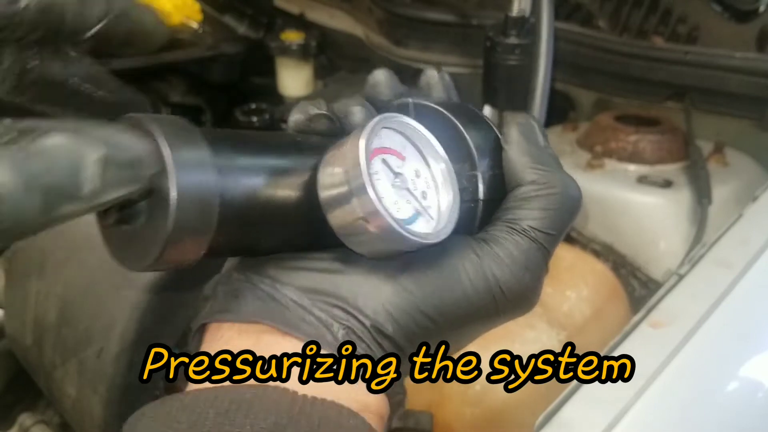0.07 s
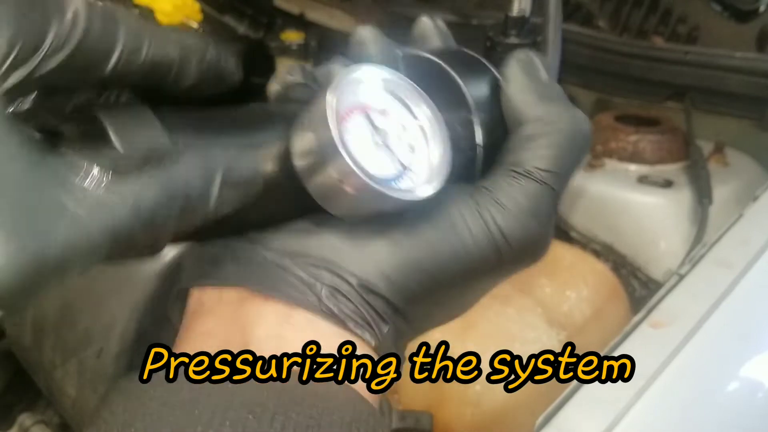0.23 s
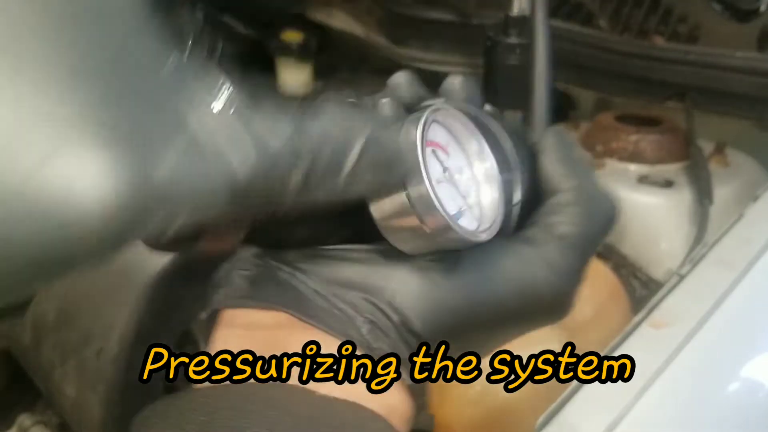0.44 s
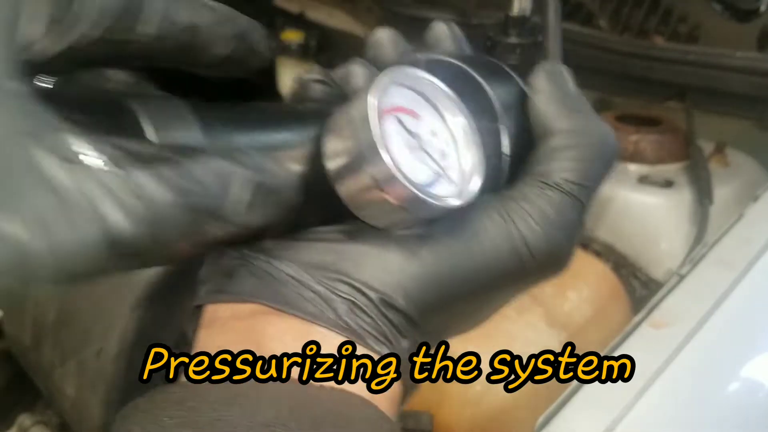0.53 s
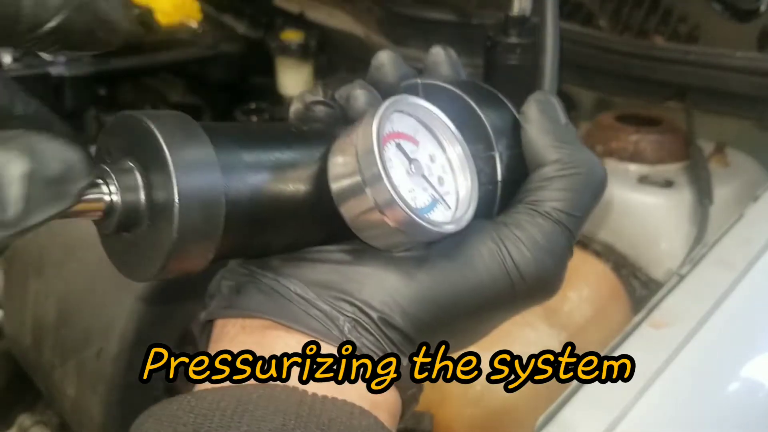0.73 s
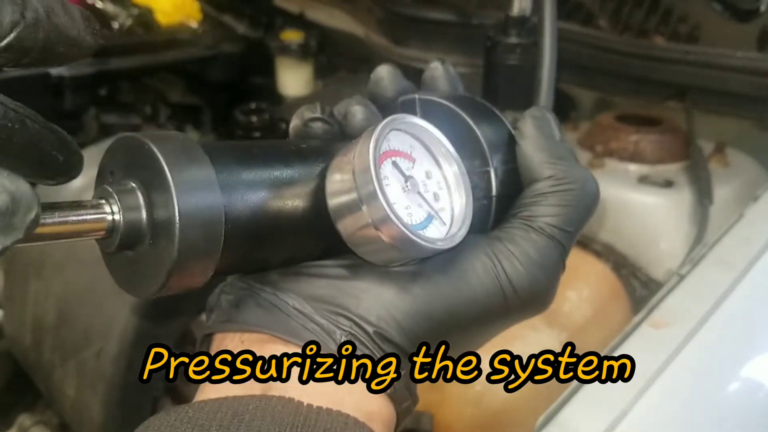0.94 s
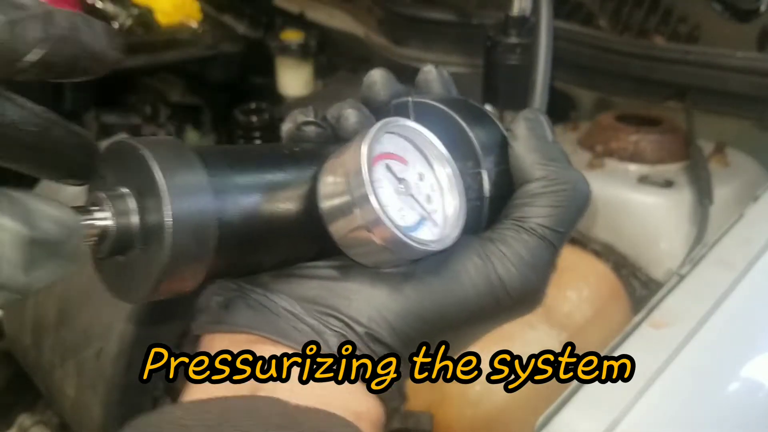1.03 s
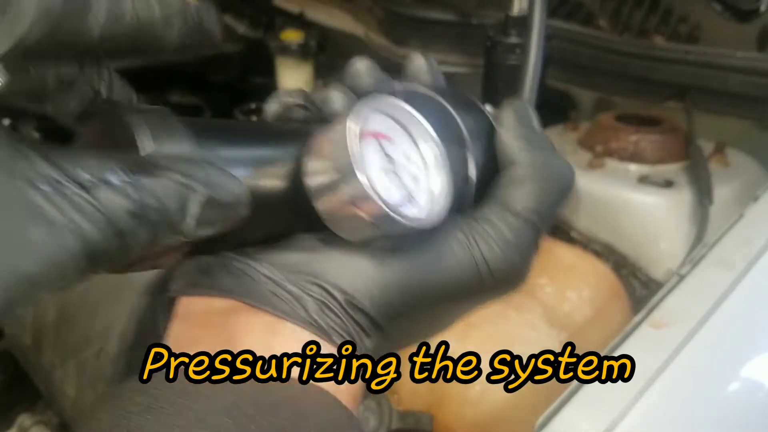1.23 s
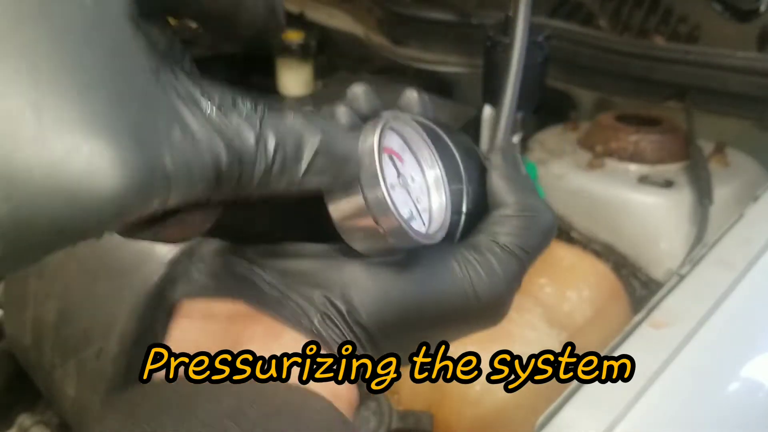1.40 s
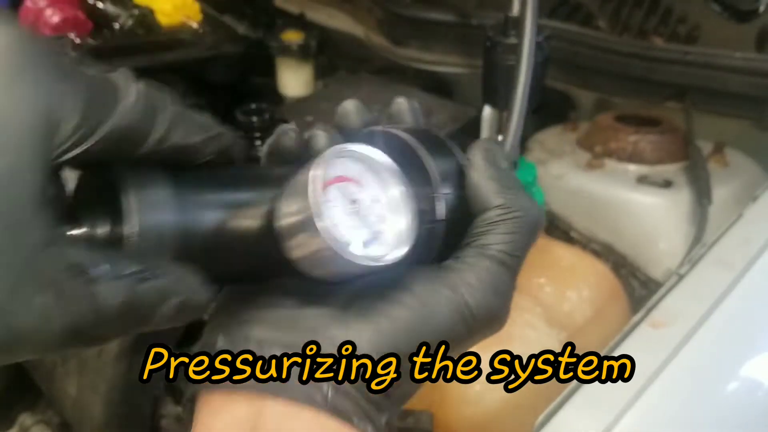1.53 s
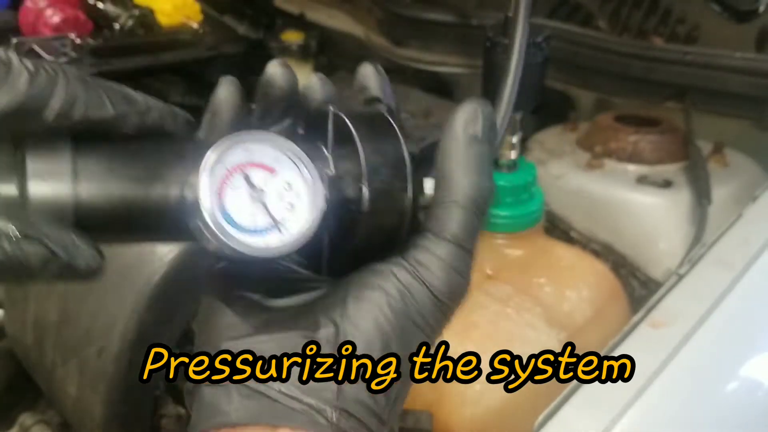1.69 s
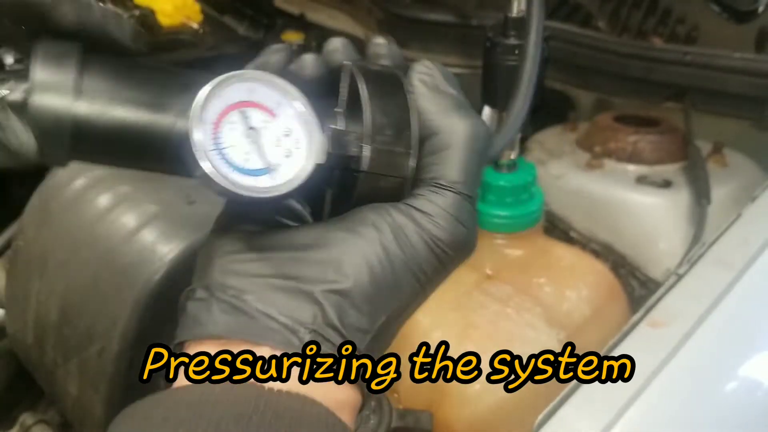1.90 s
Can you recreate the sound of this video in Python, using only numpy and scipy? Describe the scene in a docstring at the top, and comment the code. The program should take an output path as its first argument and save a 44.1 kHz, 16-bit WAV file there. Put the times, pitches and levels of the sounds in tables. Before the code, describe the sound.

Close up over a car engine bay, a hand pump is pushed twice, its airy hiss rising to a hard knock each time. Softer rubbing fills the pull back, with small handling ticks and one handle clack near the end.

```python
"""Hand pump over an engine bay

Two close strokes of a pressure pump. The piston seal hisses along the barrel; late in each push air
rushes and whistles through the valve, then the piston knocks on the end stop and the last air spits out.
The handle clacks once, rod and gloves tick, hands bump, and a low machine rumble lies beneath."""
import sys
import numpy as np
from scipy import signal
from scipy.fft import rfft, irfft, next_fast_len
from scipy.io import wavfile
from scipy.ndimage import map_coordinates

SR = 44100
rng = np.random.default_rng(int(sys.argv[2]) if len(sys.argv) > 2 else 0)


def master_out(mix):
    """Clip the mix to full scale and print it as 16-bit PCM to the path in sys.argv[1]."""
    frames = np.transpose(np.atleast_2d(mix))
    ceiling = np.clip(frames, -1, 1)
    pcm = np.round(ceiling * 32767).astype(np.int16)
    wavfile.write(sys.argv[1], SR, pcm)


N = 85995


def amp(db):
    """Decibels to gain."""
    return 10 ** (np.asarray(db) / 20)


def unit(x):
    """Scale to rms 1."""
    return x / np.sqrt(np.mean(x ** 2) + 1e-20)


def clock():
    """The time of each sample in seconds."""
    return np.arange(N) / SR


def along(points, hz):
    """Read a curve of (f/Hz, value) points on a log frequency axis."""
    f, values = np.transpose(points)
    return np.interp(np.log(hz + 1), np.log(f + 1), values)


def wobble(rate):
    """A smooth random curve with rate knots a second."""
    return map_coordinates(rng.standard_normal(N // 8), [clock() * rate], mode="wrap")


def filtered(x, response):
    """Filter x by a complex response of frequency."""
    size = next_fast_len(N + SR // 2)
    return irfft(rfft(x, size) * response(np.fft.rfftfreq(size, 1 / SR)), size)[..., :N]


def noise(spectrum, alike=1):
    """Coloured stereo noise of rms 1; alike is the share of power common to both channels."""
    share = np.clip(alike, 0, 1)
    white = rng.standard_normal((3, N))
    pair = np.sqrt(share) * white[0] + np.sqrt(1 - share) * white[1:]
    return unit(filtered(pair, lambda hz: amp(along(spectrum, hz))))


def tone(hz, width_hz):
    """A narrow breathy tone whose pitch scatters by about width_hz."""
    pitch = hz + width_hz * wobble(1200)
    return np.sqrt(2) * np.sin(2 * np.pi * np.cumsum(pitch) / SR)


def place(x, pan_db, lag_s=0, lead=None):
    """Pan left by pan_db (number or curve); the right trails by lag_s or by the phase curve lead."""
    def ears(hz):
        ratio = amp(along(pan_db, hz) if np.ndim(pan_db) else pan_db + 0 * hz)
        phase = 2 * np.pi * hz * lag_s if lead is None else along(lead, hz)
        return 2 * np.array([ratio, np.exp(-1j * phase)]) / (1 + ratio)
    return filtered(x, ears)


def gate(start, end, attack_s, release_s):
    """An envelope that rises at start, holds, and dies away after end."""
    rise = 1 - np.exp(-np.maximum(clock() - start, 0) / attack_s)
    return rise * np.exp(-np.maximum(clock() - end, 0) / release_s)


def ring(start, modes, contact_s):
    """Damped modes (f/Hz, level/dB, t60/s) pushed inward by a blow; longer contact softens the attack."""
    t = np.maximum(clock() - start, 0)
    ringing = sum(amp(db - 60 * t / t60) * np.sin(2 * np.pi * hz * t) for hz, db, t60 in modes)
    return -(1 - np.exp(-t / contact_s)) * ringing


def machine_rumble():
    """A steady low machine rumble in the workshop."""
    # rumble spectrum: f/Hz, level/dB
    spectrum = [(20, -22.5), (40, -8), (68, 4), (100, -6.5), (160, -17), (280, -23), (400, -19.5),
                (490, -29.5), (570, -17), (660, -26.5), (1150, -26), (1500, -43.5), (5000, -42),
                (15000, -54.5)]
    return place(amp(-53) * noise(spectrum, alike=0.88), pan_db=4.5)


def reflections(x, space, delay_s):
    """The diffuse tail of a space, with its own level and decay at each frequency."""
    space = np.array(space)
    hz, t, grains = signal.stft(rng.standard_normal((2, SR // 2)), SR, nperseg=128)
    fade = amp(-60 * t / along(space[:, [0, 2]], hz)[:, None])
    energy = np.mean(fade ** 2, axis=1, keepdims=True) * (SR // 2)
    fade *= amp(along(space[:, :2], hz))[:, None] / np.sqrt(energy)
    tail = signal.istft(grains * fade, SR, nperseg=128)[1]
    wet = signal.fftconvolve(x.mean(axis=0)[None], tail, axes=1)[:, :N]
    return filtered(wet, lambda f: np.exp(-2j * np.pi * f * delay_s))


def hand_bumps():
    """Dull thuds of the hands changing their grip."""
    # grip changes: t/s, level/dB, f/Hz
    bumps = [(0.02, -32, 94), (0.106, -37, 75), (0.351, -40, 100), (0.404, -40, 84), (1.078, -36, 99),
             (1.887, -41, 71)]
    t60_s = 0.037
    thuds = sum(ring(start, [(hz, db, t60_s)], contact_s=0.00033) for start, db, hz in bumps)
    return place(thuds, pan_db=6)


def glove_brush():
    """A glove brushes the barrel in one soft swell of friction noise."""
    # the brush: peak t/s, half-width/s, level/dB
    brushes = [(1.595, 0.045, -53.5)]
    # glove friction spectrum: f/Hz, level/dB
    spectrum = [(300, -7.5), (1300, -7.5), (2100, -1), (2800, -13), (8000, -20), (15000, -17.5)]
    swell = sum(amp(db) * np.exp(-.5 * ((clock() - peak) / width) ** 2) for peak, width, db in brushes)
    return swell * noise(spectrum, alike=.5)


def handle_and_ticks():
    """The handle clacks and rings briefly; rod and gloves tick, each a tiny ping with a bright crack."""
    # handle clack: t/s, level/dB
    clacks = [(1.5530, -24.5)]
    # handle modes: f/Hz, level/dB, t60/s
    modes = [(205, -15.5, 0.02), (770, -27, 0.0042), (1090, 6, 0.0098), (1360, 6, 0.0084),
             (2110, 3.5, 0.014), (2340, 3, 0.017), (2620, -24, .012), (5800, -18, 0.012),
             (7240, -7.5, 0.0083), (8070, -9, 0.013), (11800, -11, .006)]
    # light contacts: t/s, level/dB, f/Hz
    ticks = [(.147, -35, 1900), (.253, -30, 2920), (.719, -34.5, 600), (1.754, -35, 6160),
             (1.756, -42.5, 2020), (1.822, -39.5, 1980)]
    tick_t60_s = 0.0056
    hits = sum(amp(db) * ring(start, modes, contact_s=0.00057) for start, db in clacks)
    crack = amp(-6) * noise([(500, -4), (2000, 5), (14000, 6)])
    for start, db, hz in ticks:
        ping = ring(start, [(hz, 0, tick_t60_s)], contact_s=.0003)
        hits = hits + amp(db) * (ping + crack * gate(start, start, attack_s=0.00035, release_s=0.0017))
    return place(hits, pan_db=11, lag_s=0.0004)


def piston():
    """The seal rubs along the barrel, louder with speed and slightly rough; the air inside sings."""
    # rub of the seal through the strokes: t/s, level/dB
    slide = [(0, -49.5), (.03, -45), (.13, -45.5), (.22, -46.5), (.28, -43.5), (.37, -45.5), (.395, -49),
             (.425, -55), (.51, -51), (.58, -44.5), (.67, -46), (.78, -50), (.84, -55.5), (0.891, -67),
             (1.0, -73.5), (1.035, -62.5), (1.077, -50.5), (1.18, -45), (1.29, -42.5), (1.41, -46),
             (1.505, -46.5), (1.545, -53.5), (1.66, -54.5), (1.72, -58), (1.80, -56.5), (1.86, -52),
             (1.95, -45.5)]
    # hiss of the seal in the barrel: f/Hz, level/dB
    barrel = [(100, -5), (550, 0), (1000, -2.5), (1450, -5), (2250, -0.5), (2550, -0.5), (3000, 0.5),
              (3500, -2.5), (4500, -3), (5750, 0.5), (6750, -3), (7600, 1), (8800, -7), (10200, -4.5),
              (12200, 1), (13200, -2.5), (14200, -3.5), (15600, -11.5)]
    # faint singing of the air, strongest in the slower parts of the strokes: t/s, level/dB
    sing = [(0, -57.5), (.1, -67), (.5, -83), (.6, -62), (.68, -54), (.8, -61), (.86, -63.5), (.9, -85.5),
            (1.01, -90.5), (1.05, -62.5), (1.1, -54), (1.2, -66), (1.8, -72.5), (1.86, -60.5), (1.95, -57)]
    sing_hz, width_hz, overtone_db = 2934, 170, -5.5
    rub_db = np.interp(clock(), *np.transpose(slide)) + wobble(220)  # about 1 dB of roughness
    rub = place(amp(rub_db) * noise(barrel, alike=0.63), pan_db=9.5, lag_s=0.0005047)
    note = tone(sing_hz, width_hz) * wobble(400)
    note += amp(overtone_db) * tone(2 * sing_hz, 2 * width_hz) * wobble(400)
    sing_db = np.interp(clock(), *np.transpose(sing))
    return rub + place(amp(sing_db) * note, pan_db=5)


def valve_rush():
    """Air forced through the valve: a rush and a narrow note swell with pressure, then stop."""
    # pushes: start/s, end/s, rush level/dB, note level/dB
    pushes = [(0.129, 0.266, -38.5, -40.5), (1.19, 1.329, -37, -44.5)]
    # rush spectrum: f/Hz, level/dB
    spectrum = [(300, -17.5), (1500, -12), (1950, -5.5), (2300, -5), (2700, -2.5), (3050, 0), (3400, -6),
                (4000, -6), (4800, -20), (9000, -25), (15000, -27.5)]
    rise_db, flutter_db = 16, 1.7
    air = np.zeros((2, N))
    for start, end, rush_db, note_db in pushes:
        progress = np.clip((clock() - start) / (end - start), 0, 1)
        flow = amp(rise_db * (progress - 1) + flutter_db * wobble(120))
        flow *= gate(start, end, attack_s=0.011, release_s=0.015)
        rush = amp(rush_db) * noise(spectrum, alike=0.37)
        note = amp(note_db) * tone(hz=3045, width_hz=150)
        air += flow * (rush + note)
    return place(air, pan_db=5, lag_s=.00006)


def valve_whistle():
    """Two thin unsteady tones swell and climb with the pressure inside the noise of the jet."""
    # whistles: start/s, end/s, first f/Hz, last f/Hz, glide exponent, level/dB, flutter/dB
    whistles = [(0.188, 0.287, 12500, 14500, 3.5, -41.5, 2), (1.233, 1.308, 13720, 14380, .5, -39, 3.5)]
    # jet spectrum: f/Hz, level/dB
    jet = [(5000, -30.5), (9600, -32), (10800, -2), (12400, -2.5), (13300, -4), (14500, -18.5),
           (15600, -18.5)]
    width_hz, swell_s, lower_ratio, lower_db, jet_db = 203, .03, .775, -14.5, -3
    t, air = clock(), np.zeros((2, N))
    for start, end, first_hz, last_hz, exponent, db, flutter_db in whistles:
        glide = np.clip((t - start) / (end - start), 0, 1) ** exponent
        pitch = first_hz + (last_hz - first_hz) * glide
        upper, lower = tone(pitch, width_hz), tone(lower_ratio * pitch, width_hz)
        swell = np.clip((t - start) / swell_s, 0, 1) * gate(start, end, 0.0052, 0.0027)
        level = amp(db + flutter_db * wobble(110)) * swell
        air += level * (upper + amp(lower_db) * lower + amp(jet_db) * noise(jet, alike=0.27))
    return place(air, pan_db=13)


def end_stop():
    """The piston hits its stop: a hard, dead knock of the body, a thud in the hand, a spit of air."""
    # hits: t/s, knock level/dB, spit level/dB
    hits = [(0.2768, -3, -27.5), (1.3128, -3, -28)]
    # pump body modes: f/Hz, level/dB, t60/s
    body = [(793, -1, 0.0077), (932, -1.5, 0.0077), (1283, 4.5, 0.0053), (1972, -10.5, 0.018),
            (2096, -5.5, 0.013), (2473, -14, 0.023), (2424, -26, 0.042), (3257, -8.5, 0.0089),
            (3577, -29.5, 0.047), (5430, -16.5, .016), (6940, -15.5, 0.0092), (8650, -37, 0.11)]
    # spectrum of the escaping air: f/Hz, level/dB
    spit = [(400, -32.5), (800, -8), (1400, -14.5), (2600, -2.5), (3700, 1.5), (4800, -9.5), (5600, -1.5),
            (7000, -9.5), (8400, -6), (9100, -18), (10500, -12.5), (11800, 3.5), (12700, -7), (13600, -1.5),
            (14400, -15), (15600, -27)]
    # the knock is louder on the left: f/Hz, left over right/dB
    knock_pan = [(150, 10.5), (900, 3.5), (1500, 10.5), (2200, 2), (3500, 1), (6000, 4.5)]
    # and arrives there first: f/Hz, phase lead/rad
    knock_lead = [(100, .05), (450, .35), (900, .85), (1700, 0.72), (2700, 0.37), (8000, 2.3), (15000, 3)]
    contact_s, thud_hz, thud_db, thud_t60_s = 0.00051, 140, -25, 0.021
    radiation_hz = 450  # the small body radiates little below this
    knocks = sum(amp(db) * ring(start, body, contact_s) for start, db, _ in hits)
    knocks = signal.sosfilt(signal.butter(2, radiation_hz, "highpass", fs=SR, output="sos"), knocks)
    hand = [(thud_hz, thud_db, thud_t60_s)]
    thuds = sum(amp(db) * ring(start, hand, contact_s) for start, db, _ in hits)
    bursts = sum(amp(db) * gate(start, start + 0.014, attack_s=0.001, release_s=0.0071)
                 for start, _, db in hits)
    air = place(bursts * noise(spit, alike=0.29), pan_db=2)
    return place(knocks + thuds, knock_pan, lead=knock_lead) + air


def scene():
    """Valve, knocks and handling with their reflections; piston, hand bumps and rumble stay dry."""
    # engine bay reflections: f/Hz, level/dB, t60/s
    bay = [(150, -13, 0.11), (800, -9, 0.054), (2300, -11, 0.054), (6000, -7, 0.023), (14000, 0, 0.073)]
    # workshop reverb: f/Hz, level/dB, t60/s
    shop = [(150, -4, 0.54), (800, -23, 0.28), (2300, -14.5, 0.31), (6000, -7, 0.23), (14000, -13, .2)]
    pump = valve_rush() + valve_whistle() + end_stop() + handle_and_ticks() + glove_brush()
    wet = reflections(pump, bay, delay_s=.004) + reflections(pump, shop, delay_s=.012)
    return pump + wet + piston() + hand_bumps() + machine_rumble()


def record(dry):
    """A brick-wall low-pass takes off the very top."""
    top_hz = 15650
    return filtered(dry, lambda hz: hz < top_hz)


dry = scene()
out = record(dry)
master_out(out)
```